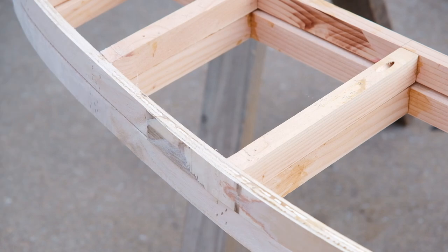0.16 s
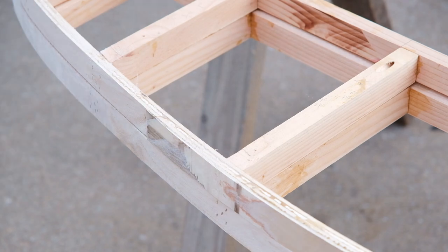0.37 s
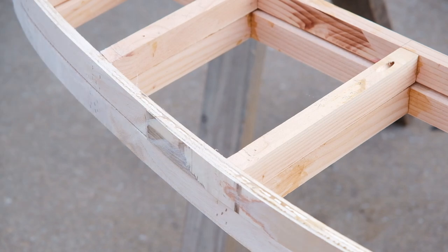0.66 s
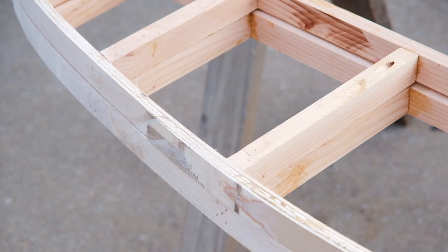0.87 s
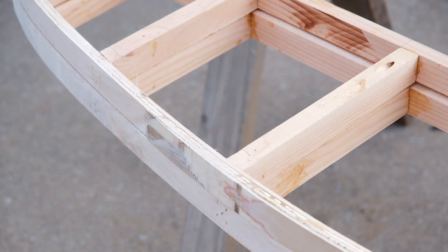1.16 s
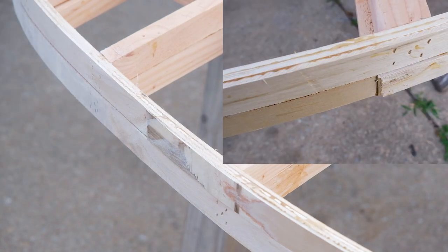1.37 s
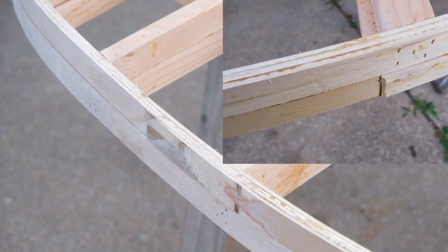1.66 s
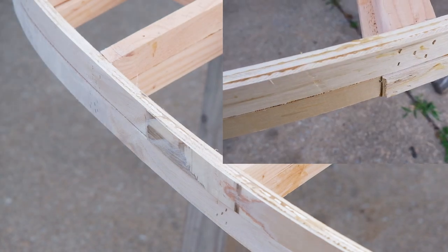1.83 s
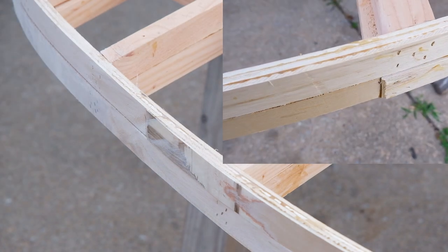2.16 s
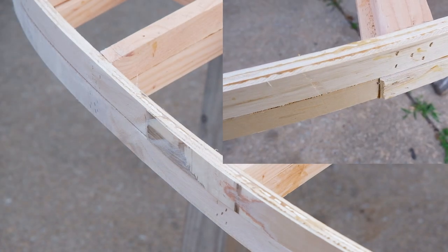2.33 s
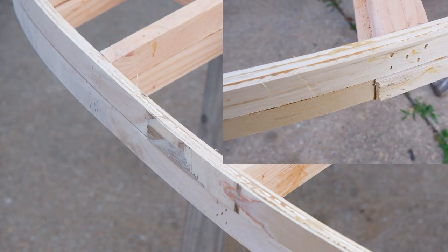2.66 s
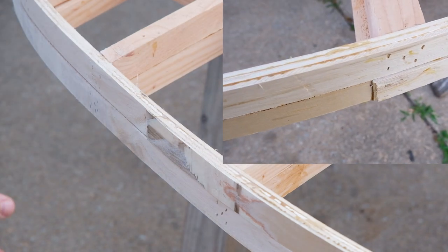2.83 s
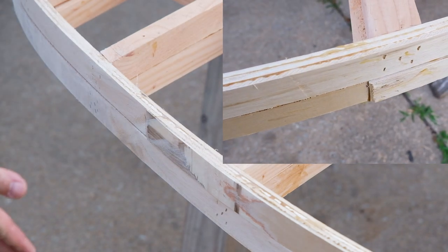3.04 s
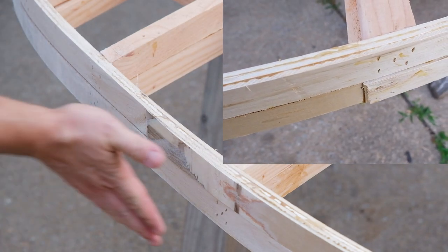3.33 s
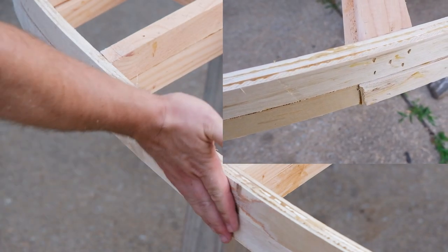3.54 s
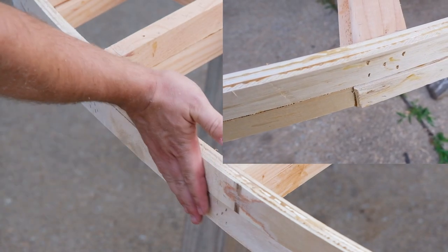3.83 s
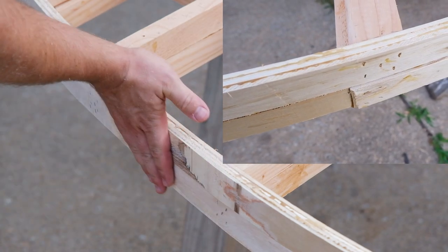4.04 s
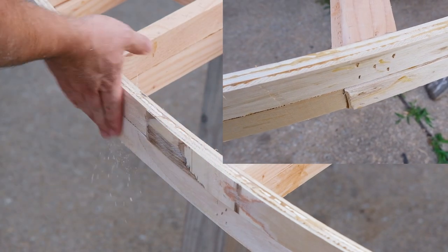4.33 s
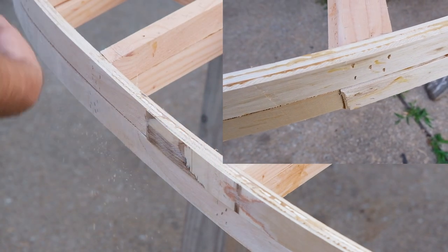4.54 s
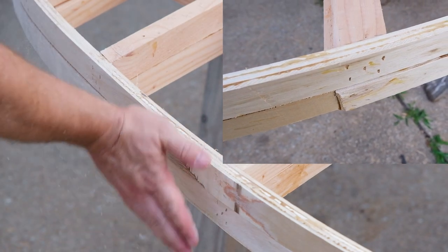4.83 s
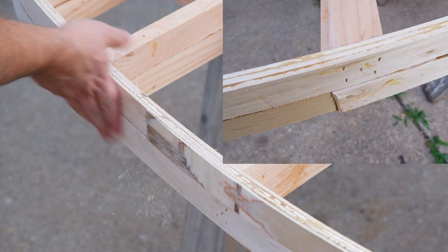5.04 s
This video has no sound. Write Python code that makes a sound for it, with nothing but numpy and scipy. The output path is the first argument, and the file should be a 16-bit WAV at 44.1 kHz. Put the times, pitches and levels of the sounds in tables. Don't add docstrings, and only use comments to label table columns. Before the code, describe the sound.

Close, dry, centred pickup of a belt sander switched off almost at once, over a concrete floor beside a timber frame. Loud motor drone, airy fan roar and bright rattle fall steadily; the fan fades first, leaving a descending thin whine and knocking gears. From about 3.3 seconds the belt sticks and scrapes in short bursts, stopping near 4.7. Faint distant hum remains, then a very quiet palm wipe on wood.

```python
import sys
import numpy as np
from scipy import signal
from scipy.fft import rfft, irfft, next_fast_len
from scipy.io import wavfile
from scipy.ndimage import map_coordinates

SR = 44100
rng = np.random.default_rng(int(sys.argv[2]) if len(sys.argv) > 2 else 0)


def int16_out(signal):
    q = np.round(np.clip(np.atleast_2d(signal).T, -1, 1) * 32767)
    wavfile.write(sys.argv[1], SR, q.astype(np.int16))


def volts_from_db(level):
    exponent = np.asarray(level, float) / 20
    return 10 ** exponent


N = 229006

FULL_SPEED_HZ, SWITCH_OFF_S = 523.8, .104
RUBBING, OIL_DRAG, AIR_DRAG = 68.8, .0536, 4.743e-4
TEETH, BARS, DRUM_RATIO = 11, 23, .5

# (full-speed level [dB], slope [dB/octave slower], knee [octaves],
# extra slope past the knee [dB/octave])
ROTOR_LAW, TWICE_LAW = (-38, 28, 1.5, 40), (-60, 5, .55, 50)
TEETH_LAW, BARS_LAW = (-66, 0, 2.75, 22), (-52, 10, 1.6, 90)
AIR_LAW, RATTLE_LAW = (-32, 2, .5, 16.5), (-27, 10, 2.5, -1.5)
GRIT_LAW, HISS_LAW = (-33, 9, 2.05, 7.5), (-35.5, 14, 2, -10)

# (frequency [Hz], density [dB per Hz])
HUM_COLOUR = [(12, -38), (20, -13), (60, -17.5), (125, -3), (300, -10), (700, -12), (1100, -14.5),
              (1600, -21), (2200, -26.5), (4500, -32.5), (8500, -39.5), (15800, -40.5)]
HUM_DB, SELF_NOISE_DB = -62, -82.5

# (time [s], housing looseness [dB], vents turned to the microphone [dB])
HAND_HOLD = [(0, 0.5, -1), (.1, 1, -3.5), (.34, 0, -2.5), (.67, -0.5, -0.5), (.95, -5.5, 1),
             (1.41, -1.5, -1), (1.75, -0.5, -1.5), (2.39, 0, 1.5), (2.76, -1, 1.5), (3.39, 2.5, -1),
             (4.22, 2.5, 0), (4.66, 6.5, -2)]
# (time [s], level [dB])
BELT_LEVEL = [
    (4.3, 3),
    (4.45, -0.5),
    (4.66, -9),
    (4.72, -63),
]

# (multiple of shaft speed [1], level against the rattle [dB])
FAINT_TONES = [(1.45, -15), (2.88, -12), (3.345, -10), (4, -11), (6.7, -13)]
# (multiple of shaft speed [1], fade time [s], level [dB])
BAR_PARTNERS = [(24, 3.0, -63), (27, 1.4, -67), (46, 2.3, -81)]
# (frequency [Hz], width [Hz], gain [dB])
MOTOR_MOUNT = [(335, 90, 8), (400, 50, -5), (490, 55, 4), (770, 70, 13), (880, 90, 13), (1010, 50, 14)]
# (frequency [Hz], width [Hz], gain [dB])
GEAR_CASE = [(870, 60, -7), (960, 90, 12), (1080, 170, 6), (1230, 150, 15), (1390, 200, 10),
             (1530, 120, 10), (1860, 160, 11), (2060, 240, 11), (2500, 380, 13), (2980, 160, 9),
             (3550, 330, 14), (4330, 450, 14), (5000, 450, 16)]
# (frequency [Hz], width [Hz], gain [dB])
BRUSH_CAP = [(4050, 250, 7), (4650, 300, -6), (5120, 250, 12), (5750, 700, 7), (6800, 300, -3),
             (7550, 500, 9), (8400, 900, 8), (9450, 250, -9), (9900, 500, 12), (11050, 1100, 9),
             (12050, 400, 5)]

# (multiple of shaft speed [1], level [dB])
FAN_COLOUR = [(.3, -34.5), (1.2, -12), (1.6, -6), (2.4, -2), (3.2, -1), (4.5, -3.5), (6.5, -7), (9, -4.5),
              (12, -7), (20, -13.5), (40, -25)]
# (multiple of shaft speed [1], width [1], gain [dB])
BLADE_WAKES = [(3.6, 0.42, 5), (10.6, 1, 5)]
# (frequency [Hz], width [Hz], gain [dB])
FAN_DUCT = [(4270, 1200, 3.5)]

# (frequency [Hz], density [dB per Hz])
RATTLE_COLOUR = [(88, -48), (150, -33.5), (201, -22.5), (550, -12.5), (736, -9), (1480, -2), (1730, -3),
                 (2020, -4), (3350, -8.5), (5440, -5), (15500, -34)]
# (frequency [Hz], width [Hz], gain [dB])
HOUSING = [(532, 110, 5.5), (1033, 42, 8.5), (1246, 34, 3.5), (1522, 200, 0), (1734, 110, -2),
           (2140, 120, -3), (2510, 280, 3.5), (2964, 670, 4.5), (3220, 230, -1), (4950, 600, 0),
           (5720, 680, 2), (6390, 500, 0.5), (7290, 1100, 4.5), (9586, 260, -4.5)]
SPLIT_HZ = 3780
# (frequency [Hz], density [dB per Hz])
BRUSH_COLOUR = [(3000, -34), (6000, -1), (8000, -1), (11000, -12.5), (14000, -19.5), (16000, -36)]
# (frequency [Hz], width [Hz], gain [dB])
VENTS = [(9900, 550, 0.5), (12200, 800, 4)]

# (frequency [Hz], level [dB], t60 [s], shaft speed at which it shakes most [Hz])
BASE_PLATE = [(1483, -2.5, 0.038, 75), (1558, -3.5, 0.032, 254), (1257, -10, 0.037, 370),
              (2717, -2, 0.016, 245), (2430, -3.5, 0.021, 140), (5560, 1, 0.0077, 160),
              (4950, -7.5, 0.0073, 170)]
CRITICAL_DB, CRITICAL_SHARE = 7.5, .4

# (multiple of shaft speed [1], resonance [Hz], width [Hz], level [dB])
CROSSINGS = [(24, 4920, 450, -53.5), (2.62, 630, 110, -56), (16.4, 3480, 160, -54)]

# (time [s], peak level [dB])
SCRAPES = [(3.3333, -49.5), (3.352, -48), (3.415, -53), (3.455, -48), (3.4894, -50), (3.602, -48),
           (3.6294, -58), (3.724, -50), (3.7644, -52), (3.858, -53), (3.881, -55), (3.904, -51.5),
           (3.999, -54), (4.05, -55), (4.0781, -54), (4.107, -56), (4.136, -56), (4.1744, -60),
           (4.212, -62), (4.2394, -58), (4.262, -55), (4.305, -58), (4.354, -54.5), (4.405, -54.5),
           (4.469, -61), (4.5436, -64), (4.595, -57.5), (4.625, -72)]
SCRAPE_S = .011
# (frequency [Hz], density [dB per Hz])
SCRAPE_COLOUR = [(1470, -39), (2500, -14), (3040, -2), (3780, -15), (4230, -2.5), (5660, -7.5),
                 (6580, -7.5), (15000, -33)]

# (time [s], peak level [dB])
TOUCH = [
    (4.9422, -59),
]
# (time [s], level [dB])
WIPE = [
    (4.92, -87),
    (4.954, -68),
    (5.084, -61.5),
    (5.1, -65),
    (5.118, -80.5),
    (5.14, -89),
]
# (frequency [Hz], density [dB per Hz])
PALM_COLOUR = [(880, -38.5), (1500, -8), (1990, -13), (2310, -7), (2800, -9), (3210, -3), (5040, -9),
               (5950, -7), (6620, -11), (10500, -15.5), (15500, -22)]

# (delay [s], level [dB])
ECHOES = [(.0061, -17.5), (0.014, -20.5), (0.027, -14.5), (0.048, -16.5)]


def rms_one(x):
    return x / np.sqrt(np.mean(x ** 2) + 1e-20)


def bell(x, centre, width, power=2):
    return 1 / (1 + (2 * (x - centre) / width) ** power)


def in_time(rows, outside=None):
    s, *columns = np.transpose(rows)
    return [np.interp(np.arange(N) / SR, s, c, left=outside, right=outside) for c in columns]


def coloured(x, points, peaks=(), rate=SR):
    hz = np.fft.rfftfreq(len(x), 1 / rate) + 1e-3
    point_hz, point_db = np.transpose(points)
    shape_db = np.interp(np.log(hz), np.log(point_hz), point_db)
    for centre_hz, width_hz, top_db in peaks:
        shape_db = shape_db + top_db * bell(hz, centre_hz, width_hz)
    return irfft(rfft(x) * volts_from_db(shape_db), len(x))


def drift(rate):
    r = np.exp(-80 * np.pi * rate / SR)
    slow = signal.lfilter([1], [1, -2 * r, r * r], rng.standard_normal(N // 40 + 2002))[2000:]
    return np.interp(np.arange(N) / 40, np.arange(len(slow)), rms_one(slow))


def tone(turns, multiple, flutter_db, wobble):
    phase = 2 * np.pi * multiple * turns + wobble * drift(28)
    return np.sqrt(2) * volts_from_db(flutter_db * drift(30)) * np.sin(phase)


def grains(per_s, spread_db):
    sizes = volts_from_db(spread_db * np.minimum(rng.exponential(1, N), 4)) * rng.standard_normal(N)
    return sizes * (rng.random(N) < per_s / SR)


def split_filter(kind):
    return signal.butter(4, SPLIT_HZ, kind, fs=SR, output="sos")


def shaft_speed():
    offset = OIL_DRAG / (2 * AIR_DRAG)
    scale = np.sqrt(RUBBING / AIR_DRAG - offset ** 2)
    coasting_s = np.maximum(np.arange(N) / SR - SWITCH_OFF_S, 0)
    angle = np.arctan((FULL_SPEED_HZ + offset) / scale) - AIR_DRAG * scale * coasting_s
    return np.maximum(scale * np.tan(angle) - offset, 0)


def sinking(shaft_hz, law, multiple=1, peaks=()):
    full_db, slope, knee, steeper = law
    octaves_slower = np.log2(FULL_SPEED_HZ / np.maximum(shaft_hz, 5))
    level_db = full_db - slope * octaves_slower - steeper * np.maximum(octaves_slower - knee, 0)
    for hz, width_hz, top_db in peaks:
        level_db = level_db + top_db * bell(multiple * shaft_hz, hz, width_hz)
    return level_db


def surroundings():
    hum = rms_one(coloured(rng.standard_normal(N), HUM_COLOUR))
    return volts_from_db(HUM_DB + .7 * drift(3)) * hum


def whine(turns, shaft_hz, rattle_db):
    rotor_db = sinking(shaft_hz, ROTOR_LAW, 1, MOTOR_MOUNT)
    twice_db = sinking(shaft_hz, TWICE_LAW, 2, MOTOR_MOUNT)
    teeth_db = sinking(shaft_hz, TEETH_LAW, TEETH, GEAR_CASE)
    bars_db = sinking(shaft_hz, BARS_LAW, BARS, BRUSH_CAP)
    rotor = volts_from_db(rotor_db - 1) * tone(turns, 1, flutter_db=1.0, wobble=.35)
    rotor = rotor + volts_from_db(twice_db) * tone(turns, 2, flutter_db=2.0, wobble=.3)
    swing = 1 + .6 * np.cos(2 * np.pi * DRUM_RATIO * turns)
    teeth = volts_from_db(teeth_db - 1) * swing * tone(turns, TEETH, flutter_db=1.3, wobble=.5)
    bars = volts_from_db(bars_db - 2) * tone(turns, BARS, flutter_db=3.0, wobble=.35)
    for multiple, fade_s, db in BAR_PARTNERS:
        fade_db = -30 * np.clip(np.arange(N) / SR / fade_s, 0, 3) ** 6
        bars = bars + volts_from_db(db + fade_db) * tone(turns, multiple, flutter_db=5.0, wobble=.5)
    faint = sum(volts_from_db(db) * tone(turns, multiple, flutter_db=4.0, wobble=.4) for multiple, db in FAINT_TONES)
    through_housing = coloured(faint, RATTLE_COLOUR, HOUSING)
    return rotor + teeth + bars + volts_from_db(rotor_db / 3 + rattle_db + 6) * through_housing


def fan(turns, shaft_hz):
    per_turn = 80
    noise = rng.standard_normal(next_fast_len(90000))
    air = coloured(noise, FAN_COLOUR, BLADE_WAKES, rate=per_turn)
    air = map_coordinates(air / np.std(air), [turns * per_turn], order=3, mode="wrap")
    softened_housing = [(hz, width_hz, 0.34 * db) for hz, width_hz, db in HOUSING]
    air = coloured(air, [(100, 0), (16000, 0.0027)], softened_housing + FAN_DUCT)
    dying_db = 18 * np.log10(np.clip(shaft_hz / FULL_SPEED_HZ, .01, 1))
    return volts_from_db(sinking(shaft_hz, AIR_LAW) + dying_db + 0.83 * drift(5.0)) * rms_one(air)


def belt(turns, rattle_db, grit_db, hiss_db):
    throb = 1 + 0.061 * np.cos(2 * np.pi * .6 * turns)
    shaking = coloured(grains(12000, spread_db=1.5), RATTLE_COLOUR, HOUSING)
    rattle = rms_one(signal.sosfilt(split_filter("low"), shaking))
    grit = rms_one(signal.sosfilt(split_filter("high"), shaking))
    hiss = rms_one(coloured(grains(14000, spread_db=-2.0), BRUSH_COLOUR, VENTS))
    patchy = drift(22)
    low = volts_from_db(rattle_db - 4.5 + 0.37 * drift(16)) * rattle
    high = volts_from_db(grit_db - 6.0 + 0.98 * patchy) * grit
    high = high + volts_from_db(hiss_db - 6.5 + 0.5 * patchy) * hiss
    return low + throb * high


def backlash(shaft_hz, rattle_db):
    knocks = grains(6 * shaft_hz, spread_db=1.5) / np.sqrt(shaft_hz + 20) + 1e-18
    rings = 0
    for hz, db, t60_s, critical_hz in BASE_PLATE:
        swell_db = CRITICAL_DB * bell(shaft_hz / critical_hz, 1, CRITICAL_SHARE)
        r, w = volts_from_db(-60 / (t60_s * SR)), 2 * np.pi * hz / SR
        ring = signal.lfilter([0, np.sin(w)], [1, -2 * r * np.cos(w), r * r], knocks)
        rings = rings + volts_from_db(db + swell_db) * ring
    rings = signal.sosfilt(signal.butter(4, [700, 6300], "band", fs=SR, output="sos"), rings)
    slack_db = -14 * shaft_hz / FULL_SPEED_HZ
    return volts_from_db(rattle_db + slack_db - 4.5) * rms_one(rings)


def crossings(turns, shaft_hz):
    out = np.zeros(N)
    for multiple, hz, width_hz, db in CROSSINGS:
        swell = bell(multiple * shaft_hz, hz, width_hz, power=4)
        out += volts_from_db(db) * swell * tone(turns, multiple, flutter_db=2.0, wobble=.3)
    return out


def scrapes():
    gate, t = np.zeros(N), np.arange(N) / SR
    for s, peak_db in SCRAPES:
        age = np.clip((t - s) / SCRAPE_S, 0, 30)
        gate += volts_from_db(peak_db - 3.0) * 3 * age * np.exp(-1.6 * age ** 1.5)
    return gate * rms_one(coloured(grains(20000, spread_db=2.0), SCRAPE_COLOUR, HOUSING[9:]))


def palm():
    level_db, = in_time(WIPE, outside=-120)
    skin = rms_one(coloured(grains(15000, spread_db=-2.0), PALM_COLOUR))
    slide = volts_from_db(level_db + 1.3 * drift(40)) * skin
    tick = np.zeros(N)
    for s, peak_db in TOUCH:
        tick[round(s * SR)] = volts_from_db(peak_db + 8.0)
    return slide + signal.sosfilt(signal.butter(2, [7500, 13000], "band", fs=SR, output="sos"), tick)


def echoes(x):
    out = x.copy()
    for delay_s, db in ECHOES:
        lag = round(delay_s * SR)
        out[lag:] += volts_from_db(db) * x[:-lag]
    return out / np.sqrt(1 + sum(volts_from_db(2 * db) for delay_s, db in ECHOES))


def scene():
    shaft_hz = shaft_speed()
    turns = np.cumsum(shaft_hz) / SR
    loose_db, facing_db = in_time(HAND_HOLD)
    rattle_db = sinking(shaft_hz, RATTLE_LAW) + loose_db
    grit_db = sinking(shaft_hz, GRIT_LAW) + facing_db
    hiss_db = sinking(shaft_hz, HISS_LAW) + 0.44 * facing_db
    pressed_db = -6 * (shaft_hz / FULL_SPEED_HZ) ** 2
    running_db, = in_time(BELT_LEVEL)
    running = volts_from_db(running_db)

    machine = fan(turns, shaft_hz) + belt(turns, rattle_db + pressed_db, grit_db + pressed_db, hiss_db)
    machine = machine + backlash(shaft_hz, rattle_db)
    mid = surroundings() + running * whine(turns, shaft_hz, rattle_db)
    mid = mid + echoes(running * machine + scrapes())
    mid = mid + crossings(turns, shaft_hz) + palm()
    side = volts_from_db(SELF_NOISE_DB) * rng.standard_normal(N)
    return np.array([mid + side, mid - side])


def low_pass(x):
    return signal.sosfilt(signal.butter(12, 16170, fs=SR, output="sos"), x)


def record(dry):
    mix = signal.sosfilt(signal.cheby2(16, 40, 15800, fs=SR, output="sos"), dry)
    return low_pass(mix)


dry = scene()
out = record(dry)
int16_out(out)
```